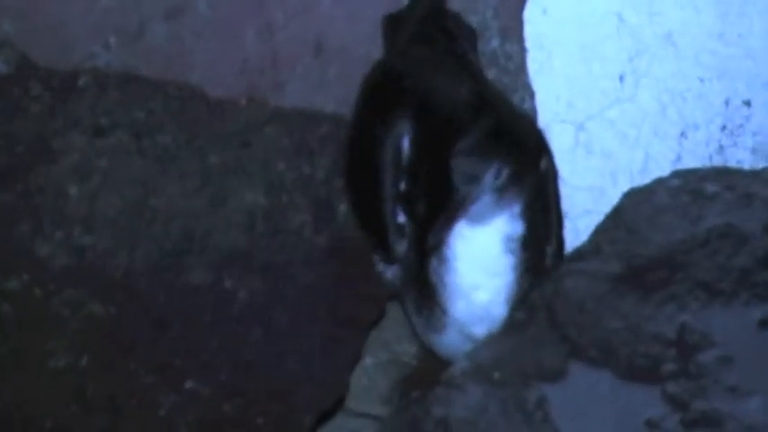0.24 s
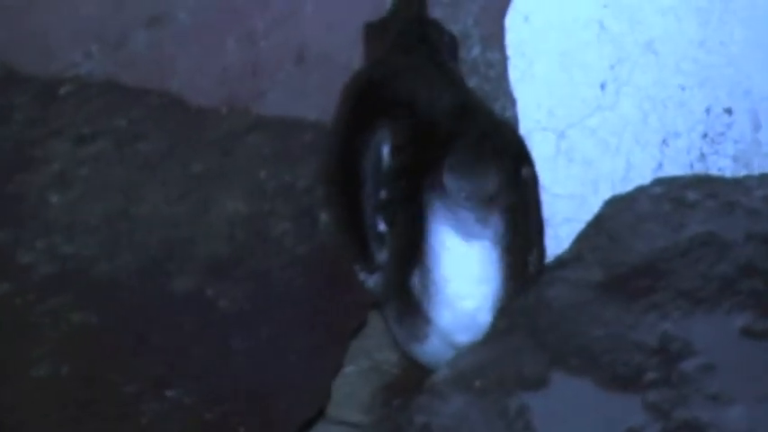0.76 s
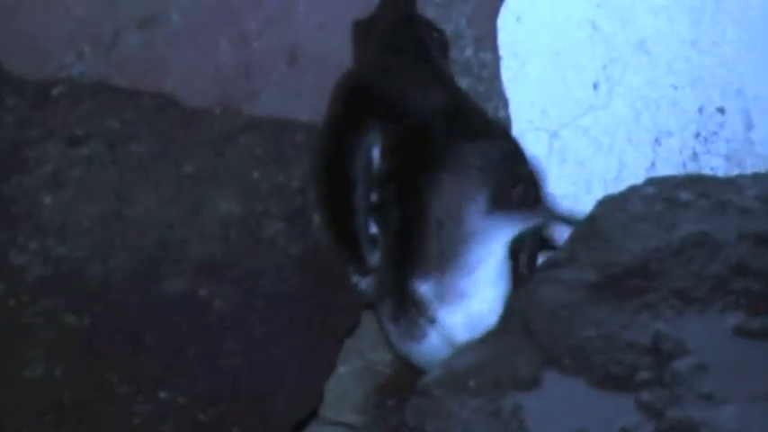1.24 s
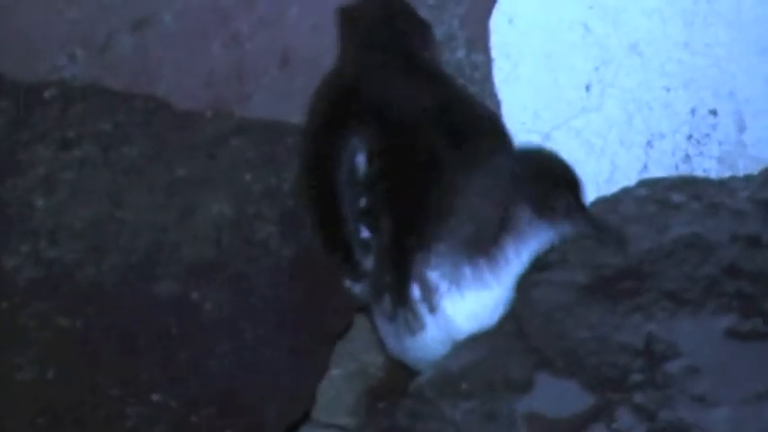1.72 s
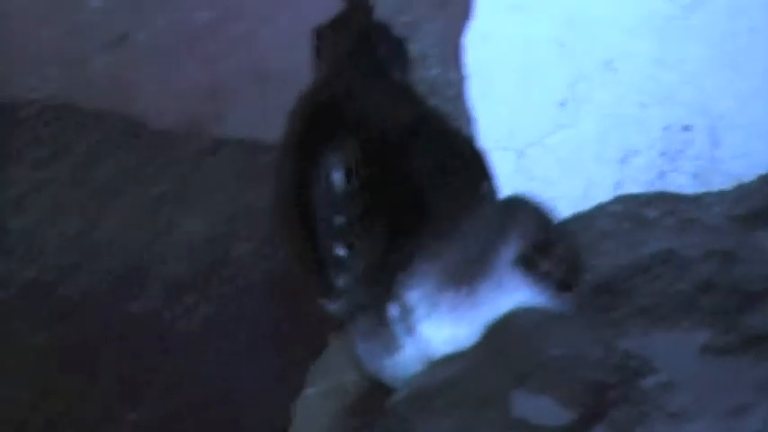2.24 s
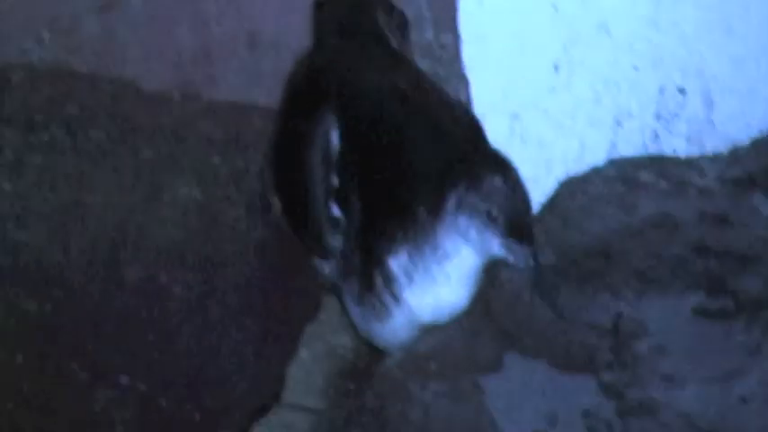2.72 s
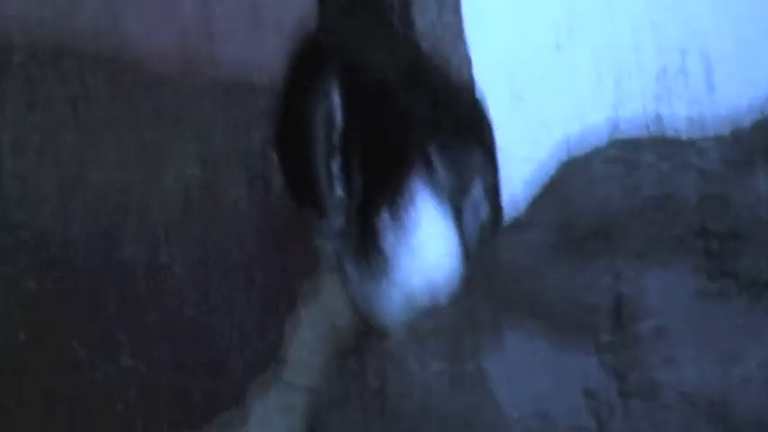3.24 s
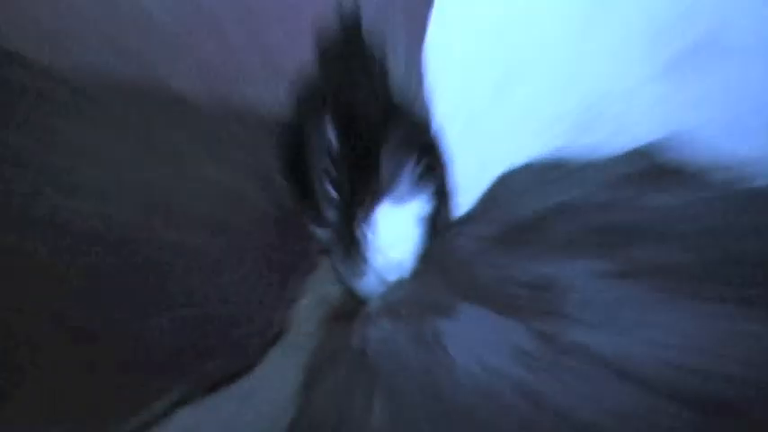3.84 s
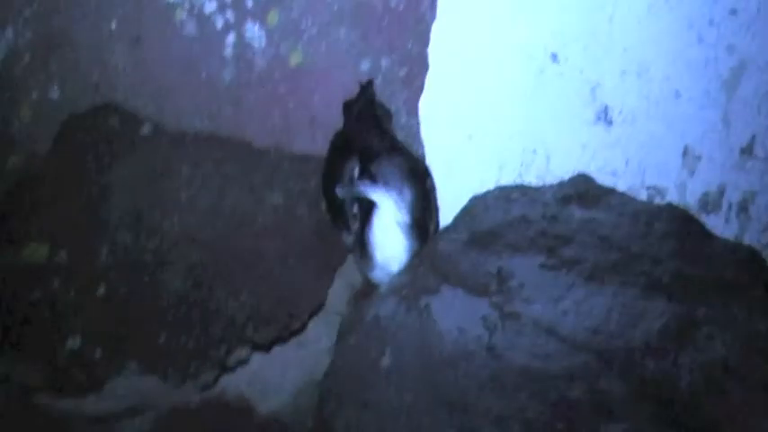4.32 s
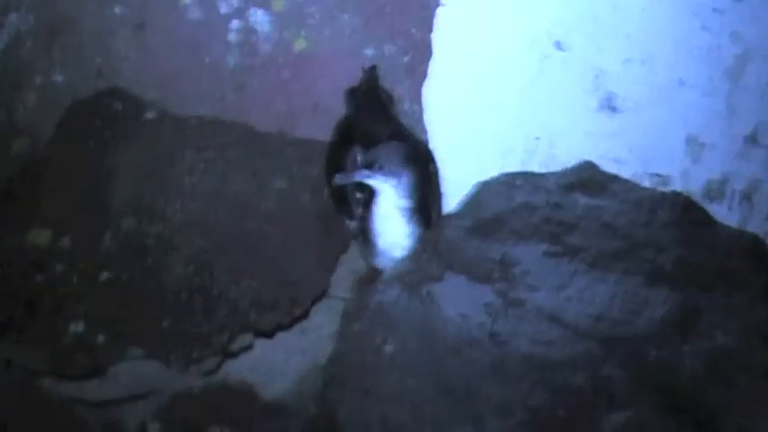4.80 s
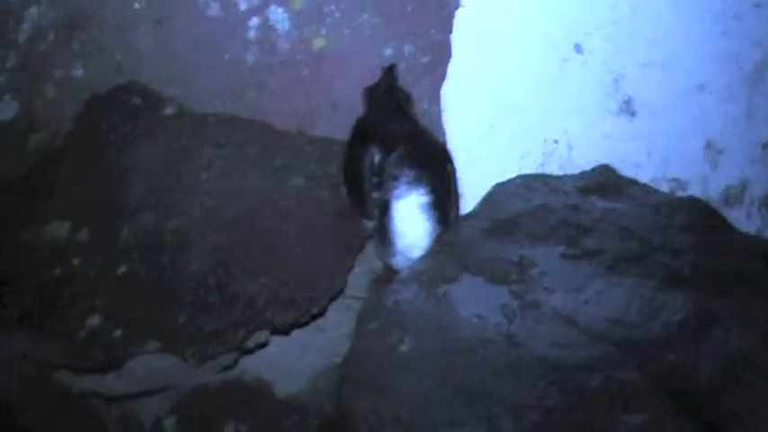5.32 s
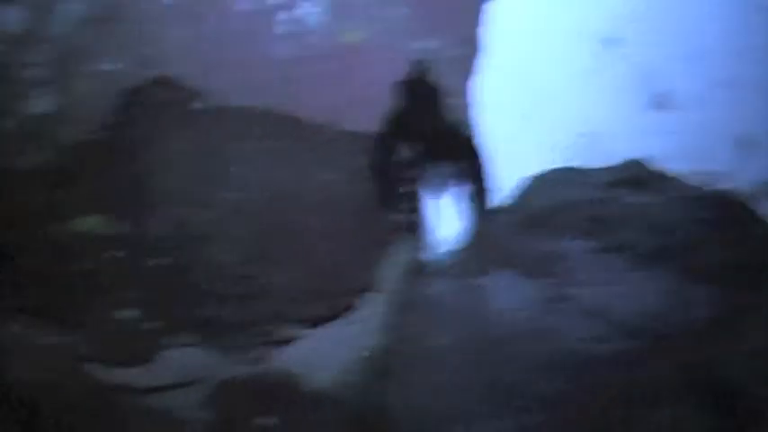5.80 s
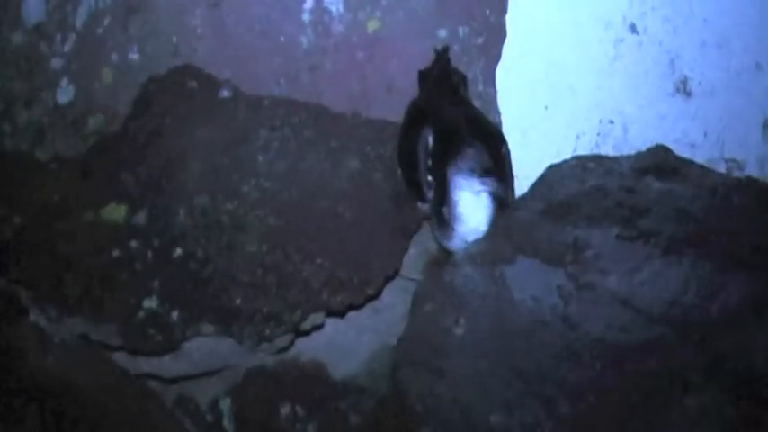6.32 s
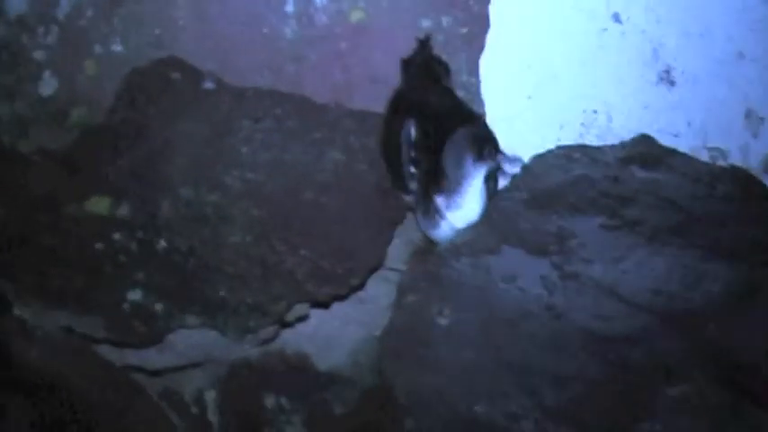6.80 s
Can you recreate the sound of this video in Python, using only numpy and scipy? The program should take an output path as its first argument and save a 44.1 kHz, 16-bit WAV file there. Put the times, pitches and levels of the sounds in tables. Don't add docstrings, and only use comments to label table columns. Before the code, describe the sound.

A continuous, blurred seabird colony in stereo, with short rocky echoes, surf, light wind and microphone hiss. Near hoarse barks and a wheeze open it; brief cries, whistles, squeaks and low moans then stand out in turn. The camera's housing ticks dryly at the microphone, its switch clicks once far louder than everything else, and a sleeve brushes it softly afterwards while the birds carry on.

```python
import sys
import numpy as np
from scipy import signal
from scipy.fft import rfft, irfft, next_fast_len
from scipy.io import wavfile
from scipy.ndimage import uniform_filter1d, map_coordinates

SR = 44100
rng = np.random.default_rng(int(sys.argv[2]) if len(sys.argv) > 2 else 0)


def volts_from_db(level):
    exponent = np.asarray(level, float) / 20
    return 10 ** exponent


def master_out(mix):
    frames = np.transpose(np.atleast_2d(mix))
    ceiling = np.clip(frames, -1, 1)
    pcm = np.round(ceiling * 32767).astype(np.int16)
    wavfile.write(sys.argv[1], SR, pcm)


N = 311331
T = np.arange(N) / SR


def unit(x):
    return x / np.sqrt(np.mean(x ** 2) + 1e-20)


def along(points, hz):
    f, v = np.transpose(points)
    return np.interp(np.log(hz + 1), np.log(f + 1), v)


def wobble(knots_per_s, size=N):
    knots = rng.standard_normal(int(size * knots_per_s / SR) + 4)
    return map_coordinates(knots, [np.arange(size) * knots_per_s / SR])


def humps(rows, slope_db):
    return sum(volts_from_db(db - slope_db * ((T - s) / half_s) ** 2) for s, half_s, db in rows)


def filtered(x, response):
    m = next_fast_len(N + 8192)
    return irfft(rfft(x, m) * response(np.fft.rfftfreq(m, 1 / SR)), m)[..., :N]


def resonances(modes):
    def response(f):
        total = 0
        for k, (c, w, db) in enumerate(modes):
            total = total + (-1) ** k * volts_from_db(db) * 1j * f * w / (c * c - f * f + 1j * f * w)
        return total
    return response


def placed(x, pan_db):
    return x * volts_from_db(np.array([[pan_db / 2], [-pan_db / 2]]))


def spread(pair, gain):
    # hz, side_minus_mid_db
    width_points = [(60, -18), (99, -2), (160, -0.5), (270, -3.5), (450, -5.5), (740, -10), (1220, -0.5),
                    (2010, -4.5), (3330, -5), (5500, -5.5), (9080, -1), (15000, -5)]

    def response(hz):
        turn = np.arctan(volts_from_db(along(width_points, hz)))
        return gain(hz) * (hz < 15830) * [np.cos(turn), np.sin(turn)]
    mid, side = filtered(pair, response)
    return unit(np.array([mid + side, mid - side]))


def echoes(x):
    # hz, t60_s
    decay_points = [(200, 0.35), (2000, 0.19), (10000, 0.2)]
    hz, t, z = signal.stft(rng.standard_normal((2, SR // 2)), SR, nperseg=256)
    fade = volts_from_db(-60 * t / along(decay_points, hz)[:, None])
    tail = signal.istft(z * fade, SR, nperseg=256)[1]
    return signal.fftconvolve(np.atleast_2d(x), tail / np.linalg.norm(tail[0]), axes=1)[:, :N]


def span(start_s, length_s, fade_s):
    cut = slice(round(start_s * SR), min(N, round((start_s + length_s) * SR)))
    u = (T[cut] - start_s) / length_s
    to_edge_s = np.minimum(u, 1 - u) * length_s
    return cut, u, np.sin(np.clip(to_edge_s / fade_s, 0, 1) * np.pi / 2)


def burst(hz, width_hz, t60):
    t = T[:SR // 25]
    edges_hz = [max(hz - width_hz / 2, 50), min(hz + width_hz / 2, .45 * SR)]
    band = signal.butter(2, edges_hz, "band", fs=SR, output="sos")
    snap = signal.sosfilt(band, rng.standard_normal(len(t)) * volts_from_db(-60 * t / t60))
    return snap / abs(snap).max()


def air():
    # hz, db_per_hz
    bed_points = [(15, -40.5), (25, -15), (170, -14), (255, -15), (462, -7.5), (605, -10), (984, -2.5),
                  (1360, -4), (1830, -23.5), (3140, -26), (4470, -29), (5250, -29), (15900, -41)]
    # peak_s, half_length_s, level_db
    gust_rows = [
        (0, 0.18, -66),
        (2.45, 0.4, -67),
        (3.65, 0.37, -62),
        (4.8, 0.46, -66),
        (6.25, 0.21, -56),
        (6.65, 0.2, -61),
    ]
    whine = resonances([(8750, 200, 0)])
    bed = spread(rng.standard_normal((2, N)), lambda hz: volts_from_db(along(bed_points, hz)) * (1 + 0.75 * abs(whine(hz))))
    treble = filtered(bed, lambda hz: (hz > 6000) & (hz < 15000))
    rumble = resonances([(130, 220, 0)])
    wind = unit(filtered(rng.standard_normal((2, N)), lambda hz: abs(rumble(hz)) ** 2))
    gusts = volts_from_db(-71) + humps(gust_rows, slope_db=6.0)
    lumps = volts_from_db(-5.0 + 0.74 * np.array([wobble(12), wobble(12)]))
    return volts_from_db(-75 + 3.5 + 0.22 * wobble(2.65)) * bed / treble.std() + gusts * lumps * wind


def throats(count, low_hz, octaves, notes_per_s, jitter):
    out, step = np.zeros((2, N)), 50
    coarse_s = T[::step]
    size = len(coarse_s)
    for k in range(count):
        pitch_hz = low_hz * 2 ** (octaves * rng.uniform() + .13 * wobble(9 * step, size=size))
        cycles = np.cumsum(pitch_hz) * step / SR
        beat = np.arange(1, cycles[-1])
        pulse_s = np.interp(beat + jitter * rng.standard_normal(len(beat)), cycles, coarse_s)
        effort = np.clip(wobble(notes_per_s * step, size=size) - .3, 0, 1.4) / np.sqrt(pitch_hz)
        level_db = rng.normal(0, 1.6) + rng.normal(0, 2.5, len(pulse_s))
        strength = np.interp(pulse_s, coarse_s, effort) * volts_from_db(level_db)
        out[k % 2] += np.bincount((pulse_s * SR).astype(int), strength, N)
    return unit(out - out.mean())


def crowd():
    # time_s, level_db
    loudness_points = [(0.0, -48), (0.79, -48), (1.12, -49.5), (1.36, -51.5), (2.02, -48), (2.54, -52.5),
                       (3.07, -49.5), (3.55, -50.5), (3.85, -49), (4.62, -49.5), (5.31, -51), (5.48, -52.5),
                       (5.7, -50.5), (6.49, -49.5), (6.8, -52), (7.06, -48.5)]
    # hz, db_per_hz
    roar_points = [(120, -17.5), (200, -9), (231, -18.5), (472, -8.5), (594, -10), (738, -7), (1130, 0),
                   (2140, -17), (2830, -21), (3080, -31.5), (3600, -24), (4680, -30), (7920, -120)]
    # peak_s, half_length_s, level_db
    surge_rows = [
        (.92, 0.15, -70),
        (2.9, 0.15, -71),
        (3.75, 0.23, -71),
        (6.25, 0.073, -57),
        (6.6, 0.84, -66.5),
    ]
    roar_db = np.interp(T, *np.transpose(loudness_points))
    voices = throats(count=44, low_hz=331, octaves=1.9, notes_per_s=11, jitter=0.072)
    blur = voices + volts_from_db(1.5) * echoes(voices) + volts_from_db(2.0) * rng.standard_normal((2, N))
    roar = spread(blur, lambda hz: volts_from_db(along(roar_points, hz)))
    roar = roar / np.sqrt(uniform_filter1d(np.mean(roar ** 2, axis=0), size=6000) + 1e-9)

    chicks = throats(count=12, low_hz=914, octaves=1.1, notes_per_s=25, jitter=0.05)
    chicks = chicks + volts_from_db(1) * rng.standard_normal((2, N))
    squeal = spread(chicks, lambda hz: resonances([(4350, 900, 0)])(hz) ** 2)
    surge = volts_from_db(-68 + 1.5 * (roar_db - roar_db.mean()) + 3 * wobble(2.96))
    surge = surge + humps(surge_rows, slope_db=11.0)

    pipers = throats(count=16, low_hz=1700, octaves=.75, notes_per_s=30, jitter=.06)
    chatter = spread(pipers + volts_from_db(4) * echoes(pipers), lambda hz: resonances([(2300, 1600, 0)])(hz) ** 2)
    return volts_from_db(-69) * chatter + volts_from_db(roar_db + 1.0) * roar + volts_from_db(-5.0) * surge * squeal


def sleeve():
    # start_s, length_s, level_db, swell_db, weave_index
    strokes = [
        (4.914, 0.21, -68.5, 8, 0),
        (5.084, .11, -59.5, 9, 0),
        (6.031, 0.265, -60, -2, 1),
        (6.4, .17, -70.5, 6, 1),
    ]
    # hz, width_hz, level_db
    weaves = [
        [(3354, 1400, 10), (10000, 930, 9), (14500, 2300, -1)],
        [(2330, 1200, 5.5), (4300, 700, 3.5), (5560, 630, 2.5), (8450, 1400, 3), (12300, 1700, 0.5)],
    ]
    grains = rng.standard_normal((2, N)) * volts_from_db(0.88 * wobble(300) + 1.6 * wobble(40))
    rubs = [spread(grains, lambda hz: abs(resonances(weave)(hz)) + 0.14 * (hz > 1500)) for weave in weaves]
    out = np.zeros((2, N))
    for start_s, length_s, db, swell_db, weave in strokes:
        cut, u, edge = span(start_s, length_s, 0.041)
        gain = volts_from_db(db + 5.5 + swell_db * (u - .5)) * edge
        out[:, cut] += placed(gain * rubs[round(weave)][:, cut], .3 + 6.1 * round(weave))
    return out


def ticks():
    # start_s, peak_db, body_db, left_minus_right_db
    tick_rows = [(0.4324, -51, -59, -3), (1.655, -58, -60, 0), (1.9138, -32, -44, 9), (1.9148, -37, -42, 4),
                 (1.9545, -55, -44, 0.0), (2.4804, -48, -62, 7), (2.915, -54, -45, 0.0),
                 (3.254, -66, -56, 2), (3.3552, -48, -39, -0.5), (3.3684, -53, -52, 0.5),
                 (3.411, -40, -40, -7), (3.7938, -51, -54, 2), (4.7063, -64, -43, 5),
                 (4.744, -57, -52, 0.5), (4.8145, -47, -38, -8), (4.8514, -60, -50, -0.5),
                 (4.8747, -42, -38, -4), (4.9073, -46, -54, 7), (4.9445, -48, -51, 16),
                 (4.9505, -39, -42, -7), (4.96, -62, -47, 0), (4.9714, -62, -42, -2),
                 (5.1098, -48, -56, -2), (5.1376, -50, -38, 7), (5.3066, -56, -39.5, 5),
                 (5.3522, -50, -51, 9), (5.4141, -46, -43, -3), (5.5691, -41.5, -44, -10),
                 (6.3101, -59, -39.5, 10), (6.329, -57, -39, 12), (6.3485, -57, -41, 8),
                 (6.6862, -41, -50, 6), (6.69, -46, -53, 12.5)]
    # start_s, peak_db
    knock_rows = [
        (1.9155, -37),
        (3.2565, -34),
        (4.8165, -34),
        (5.138, -33.5),
        (6.328, -37),
    ]
    out = np.zeros((2, N + SR))
    for s, db, body_db, pan_db in tick_rows:
        tick = volts_from_db(db) * burst(9400, 11900, t60=0.0075) + volts_from_db(body_db) * burst(2600, 3200, t60=0.013)
        out[:, round(s * SR):][:, :len(tick)] += placed(tick, pan_db)
    for s, db in knock_rows:
        knock = volts_from_db(db) * burst(1164, 1170, t60=0.037)
        out[:, round(s * SR):][:, :len(knock)] += knock
    return out[:, :N]


def panels():
    # start_s, pitch_hz, peak_db, t60_s
    panel_rows = [(1.9137, 1150, -29, .03), (1.9142, 3250, -32, .02), (1.9140, 5500, -36, .01),
                  (1.9140, 10400, -39, .008), (1.9140, 9000, -40, .008), (3.2541, 1150, -28, .022),
                  (3.2545, 2500, -39, .025), (3.2548, 610, -36, .035), (3.2545, 1850, -34, .025),
                  (3.2546, 3100, -40, .025), (4.8153, 1000, -30, .03), (4.8148, 1950, -33, .02),
                  (4.8150, 2550, -33, .02), (4.8146, 4000, -37, .012), (4.8156, 3200, -34, .015),
                  (4.8150, 6300, -43, .012), (5.1378, 2300, -38, .015), (5.1378, 3800, -39, .012),
                  (5.1378, 4900, -40, .012)]
    out, t = np.zeros(N + SR), T[:SR // 25]
    for s, hz, db, t60 in panel_rows:
        decay = volts_from_db(db + 2.5 * wobble(400, size=len(t)) - 60 * t / t60)
        attack = 1 - np.exp(-t / .0002)
        out[round(s * SR):][:len(t)] += decay * attack * np.sin(2 * np.pi * hz * t)
    return out[:N]


def switch():
    # start_s, peak_db, pitch_hz, brightness_db
    contacts = [
        (4.2734, -19, 3900, -33),
        (4.2737, -16.5, 2540, -27),
        (4.2781, -9, 3200, -7),
        (4.2786, -6, 3700, -6),
        (4.2807, -7.5, 2540, -12),
        (4.281, -11, 4500, -12),
        (4.284, -19, 2650, -22),
        (4.2862, -19, 2900, -20),
        (4.2849, -18, 3600, -20),
        (4.288, -28, 2940, -22),
    ]
    # hz, level_db, t60_s
    shell_modes = [(1240, -17, 0.05), (2650, -2, 0.023), (3370, -12.5, 0.041), (3600, -19, 0.086),
                   (3900, -14, .06), (4200, -12, 0.055), (4800, -13, 0.065), (7200, -24, .054),
                   (5450, -14, 0.04), (8900, -40, 0.06), (10100, -28, 0.065), (10790, -40, 0.059)]
    out, t = np.zeros(N), T[:SR // 25]
    for s, db, pitch_hz, bright_db in contacts:
        ring = 0
        for hz, level_db, t60 in shell_modes:
            mode_db = level_db + rng.normal(0, 2.7) + 4.5 * wobble(430, size=len(t)) - 60 * t / t60
            ring = ring + volts_from_db(mode_db) * np.sin(2 * np.pi * hz * t)
        envelope = 1.6 * (1 - np.exp(-t / 0.00013)) * volts_from_db(-60 * t / 0.0035)
        snap = envelope * np.sin(2 * np.pi * pitch_hz * t)
        snap = snap + volts_from_db(bright_db) * burst(9000, 7000, t60=0.0031)
        rattle = volts_from_db(-15.5) * burst(2950, 3800, t60=0.045)
        out[round(s * SR):][:len(t)] += volts_from_db(db + 1.0) * (snap + rattle + volts_from_db(-19.5) * ring)
    out = filtered(out, lambda hz: 1j * hz / (110 + 1j * hz))

    jolt = np.zeros(N)
    shake = volts_from_db(-21) * burst(554, 127, t60=0.061) + volts_from_db(-36) * burst(200, 200, t60=0.05)
    jolt[round(contacts[1][0] * SR):][:len(t)] = shake
    thud = np.zeros(N)
    thud[round(contacts[2][0] * SR):][:len(t)] = volts_from_db(-45 - 60 * t / .08) * np.sin(2 * np.pi * 90 * t)
    delayed = np.roll(out, 5)
    return thud + jolt * [[1], [-.75]] + placed(out, -8.5) + volts_from_db(-30) * np.array([delayed, -delayed])


def notes(rows, partials, top, bend, rasp_db, waver, droop, scoop=0., scoop_per_s=0., fade_s=0.015):
    out = np.zeros((2, N))
    for start_s, length_s, mid_hz, db, *slant_hz in rows:
        cut, u, edge = span(start_s, length_s, fade_s)
        rise = np.clip(1 - u / top, 0, 1)
        fall = np.clip((u - top) / (1 - top), 0, 1)
        depth = scoop + scoop_per_s * length_s
        arch = 1 - depth * rise ** (1.65 * bend) - droop * fall ** bend
        hz = mid_hz * arch + sum(slant_hz) * (u - .5)
        turn = 2 * np.pi * np.cumsum(hz * (1 + waver * wobble(119.0, size=len(u)))) / SR
        tone = sum(volts_from_db(level_db) * np.sin(ratio * turn) for ratio, level_db in partials)
        gain = np.sqrt(2) * volts_from_db(db + rasp_db * wobble(90.5, size=len(u))) * edge
        out[:, cut] += placed(gain * tone, rng.normal(0, 0.91))
    return out


def callers():
    # start_s, length_s, top_hz, level_db, slant_hz
    whistle_rows = [(0.029, 0.067, 3075, -64.5, -151), (0.189, 0.035, 3575, -64.5, -1),
                    (0.271, 0.044, 2805, -67.5, -1), (0.421, 0.061, 3125, -64.5, -101),
                    (0.796, 0.077, 3055, -62.4, 40), (1.168, 0.084, 2945, -68.5, 60),
                    (1.618, 0.072, 2965, -65.5, -1), (1.801, 0.041, 2835, -65.5, -1),
                    (2.336, 0.031, 2705, -64.5, 501), (2.376, 0.044, 2875, -64.5, -201),
                    (2.426, 0.049, 2825, -69.5, 101), (2.552, 0.041, 2905, -67.5, -251),
                    (2.693, 0.079, 3005, -60.5, -1), (2.701, 0.021, 2755, -65.5, 201),
                    (2.841, 0.031, 2685, -66.5, 251), (3.046, 0.098, 2945, -59.9, -60),
                    (3.481, 0.098, 2945, -62.4, -1), (3.956, 0.075, 2935, -65.2, -1),
                    (4.146, 0.034, 2815, -59.5, -1), (4.206, 0.124, 3035, -58.6, -1),
                    (4.396, 0.087, 2865, -62.8, -1), (4.701, 0.034, 2815, -58.5, -1),
                    (4.76, 0.142, 2990, -60.5, -260), (5.286, 0.092, 2865, -56.8, -40),
                    (5.336, 0.086, 3115, -67.2, -40), (5.646, 0.026, 2885, -67.5, 251),
                    (5.691, 0.034, 2885, -67.5, 251), (5.772, 0.094, 3165, -65, -101),
                    (5.869, 0.091, 3125, -61.4, -1), (6.211, 0.08, 2960, -65.2, -1),
                    (6.644, 0.076, 2945, -60.8, -1), (6.831, 0.044, 2355, -63.5, 101),
                    (6.846, 0.049, 2885, -69.5, 201)]
    # start_s, length_s, top_hz, level_db
    squeak_rows = [(1.51, .06, 4500, -65), (2.53, 0.069, 4550, -69), (2.57, 0.035, 4500, -75.5),
                   (2.68, 0.048, 4470, -65), (2.735, .04, 4020, -69), (2.83, .04, 4500, -70),
                   (2.88, .035, 4570, -63), (2.9, .04, 4400, -65), (2.94, 0.065, 4500, -62),
                   (2.99, .05, 4600, -65), (3.06, 0.055, 4400, -67), (2.9, .04, 4900, -70),
                   (6.98, 0.028, 4480, -64), (6.53, .05, 4230, -61.5), (3.59, 0.059, 4510, -61.5),
                   (3.74, 0.054, 4420, -64), (5.33, 0.068, 4140, -69), (6.0, 0.062, 4260, -64),
                   (6.83, 0.035, 4430, -61.5), (6.855, .03, 4600, -65)]
    # start_s, length_s, middle_hz, level_db, slant_hz
    peep_rows = [(1.075, 0.045, 2120, -62, 250), (1.27, .035, 1950, -66, -150),
                 (1.632, 0.048, 2070, -56.5, -180), (3.595, 0.04, 1620, -58, 200),
                 (4.66, .035, 1650, -56, 40), (4.83, .04, 1930, -63, 40), (5.27, 0.056, 1880, -59, -420),
                 (5.33, 0.098, 1770, -66, 30), (5.43, .1, 1810, -67, 120), (5.538, 0.034, 2060, -58, 443),
                 (5.76, 0.057, 2060, -63, -20), (5.7, 0.035, 1780, -60.5, -150), (6.2, .06, 2400, -67, 300),
                 (5.8, .04, 2380, -66, 0), (2.315, .045, 2600, -71, -150), (2.72, .04, 2150, -65, 40),
                 (4.13, .11, 4300, -69.5, 58), (5.23, .05, 2350, -66, 100), (5.73, .04, 2350, -65, -300),
                 (6.58, .07, 1740, -63, -60), (6.34, .2, 2230, -69, 0), (3.89, .05, 1880, -65, 0)]
    # start_s, length_s, middle_hz, level_db, slant_hz
    wail_rows = [
        (.28, 0.12, 763, -52, 92),
        (.55, 0.2, 795, -50.5, -110),
        (.74, 0.173, 734, -53, -41),
    ]
    # start_s, length_s, middle_hz, level_db, slant_hz
    thread_rows = [
        (6.7, .19, 5000, -73, -290),
        (6.73, .05, 4080, -68, -30),
    ]
    # start_s, length_s, middle_hz, level_db, slant_hz
    cry_rows = [(1, 0.046, 1155, -51.5, -33), (3.7, 0.056, 1100, -52, 177), (3.78, .17, 1037, -55.5, 47),
                (4.07, 0.049, 1040, -52, 13), (6.02, 0.053, 1085, -48.5, -68),
                (6.18, 0.045, 1060, -50, -160), (6.22, .11, 940, -52.5, -20), (6.33, .09, 930, -55, -20),
                (6.73, 0.055, 1107, -51, -200), (4.21, .05, 1290, -53, 0), (.88, .07, 1240, -54, 120),
                (.7, .07, 1470, -55, -40), (6.24, .11, 1380, -57, -20), (5.61, .06, 1350, -59, 120),
                (5.82, .06, 1080, -53, -100), (5.28, .1, 860, -54, -40), (3.86, .08, 1120, -54, 0),
                (.2, .1, 1260, -56, 80), (6.86, 0.072, 952, -50.5, 14), (6.91, 0.12, 1111, -50.5, 31),
                (.57, 0.09, 1450, -50, -40), (.8, .09, 1426, -55, 80), (1.94, 0.086, 1405, -52.5, 40),
                (2.07, 0.078, 1450, -55.5, -70), (0, 0.043, 1403, -50, -200),
                (3.715, 0.07, 1340, -53, -220), (3.14, .06, 1040, -53, 120), (3.34, .1, 990, -54, 30),
                (2.91, .05, 1080, -54, 80), (3.63, .04, 1280, -54, -60), (5.94, .04, 1100, -53, 0),
                (6.6, 0.057, 1430, -54, 0), (6.69, 0.033, 1262, -53, -28)]
    # start_s, length_s, middle_hz, level_db, slant_hz
    moan_rows = [
        (3.44, 0.036, 466, -47, 28),
        (6.69, 0.079, 430, -46, -25),
        (6.915, 0.07, 700, -52, 153),
        (6.87, 0.058, 440, -52, 116),
        (5.77, .06, 520, -52, 120),
        (5.5, .07, 360, -52, 30),
        (5.47, .04, 750, -52, 0),
    ]
    whistles = notes(whistle_rows, [(1, 0), (2, -32)], top=.34, bend=2.9, rasp_db=2.2, waver=.003,
                     droop=0.141, scoop=.04, scoop_per_s=2.33, fade_s=.008)
    squeaks = notes(squeak_rows, [(1, -5), (.955, -14), (1.04, -15)], top=.5, bend=1.5, rasp_db=3.5,
                    waver=.013, droop=.03, scoop=.025)
    peeps = notes(peep_rows, [(1, 3.5), (2, -31)], top=0.4, bend=1.27, rasp_db=2, waver=0.0096,
                  droop=0.031, scoop=0.029)
    wails = notes(wail_rows, [(.5, -21.5), (1, -1.5), (1.5, -12), (2, -6), (2.5, -14)], top=0.61, bend=0.99,
                  rasp_db=2.5, waver=.009, droop=-0.0088, scoop=-0.0201)
    threads = notes(thread_rows, [(1, 0)], top=.5, bend=1.5, rasp_db=1.5, waver=.002, droop=.001)
    cries = notes(cry_rows, [(1, 0), (2 / 3, -12), (4 / 3, -12)], top=0.56, bend=0.85, rasp_db=2.5,
                  waver=0.015, droop=0.029, scoop=.02)
    moans = notes(moan_rows, [(1, -5.0), (2, -8.5), (3, -34)], top=0.52, bend=2.1, rasp_db=2.0,
                  waver=0.006, droop=0.18, scoop=0.13)
    return threads + whistles + squeaks + peeps + wails + cries + moans


def hoarse(rows, pulse_hz, breath, modes):
    effort = 0
    for s, held_s, db in rows:
        rise_db = 600 * np.clip(s - T, 0, 1)
        fall_db = 480 * np.clip(T - s - held_s, 0, 1)
        effort = effort + volts_from_db(db - rise_db - fall_db)
    cycles = np.cumsum(pulse_hz * volts_from_db(.9 * wobble(50)) / SR)
    beats = np.diff(np.floor(cycles), prepend=0)
    drive = unit(beats * volts_from_db(rng.normal(0, 5.2, N))) + breath * rng.standard_normal(N)
    mouth = resonances([(1900, 1200, 0)])
    return effort * unit(filtered(drive, lambda hz: resonances(modes)(hz) * (mouth(hz) + 0.034)))


def barks():
    # start_s, held_s, level_db
    bark_rows = [
        (.155, 0.016, -40.5),
        (.2, 0.032, -53.5),
        (.34, 0.046, -50),
        (.41, 0.02, -53),
        (.46, .01, -54),
        (.5, 0.016, -56),
        (.535, 0.021, -51),
    ]
    # start_s, length_s, middle_hz, level_db, slant_hz
    yelp_rows = [
        (.148, .045, 1810, -37.5, -200),
        (.19, .055, 1760, -58, -30),
        (.325, 0.075, 1750, -45.5, -30),
        (.4, .045, 1860, -52, 0),
        (.53, 0.036, 1850, -44, -220),
        (.335, .04, 1870, -48.5, -40),
        (.41, .04, 1700, -52, 0),
        (.52, .04, 2210, -55, -40),
        (.48, .04, 2400, -58, -200),
        (.57, .06, 1850, -55, -80),
    ]
    # start_s, held_s, level_db
    wheeze_rows = [
        (.58, 0.26, -49),
    ]
    # hz, width_hz, level_db
    throat_modes = [(1700, 290, 19.5), (2570, 660, 10), (1390, 300, -8), (2900, 500, -27), (4900, 2000, 1)]
    # hz, width_hz, level_db
    gape_modes = [(1100, 250, -8), (1450, 220, -5.5), (1720, 200, -12), (2000, 300, -34)]
    bark = hoarse(bark_rows, pulse_hz=190, breath=1.8, modes=throat_modes)
    yelps = notes(yelp_rows, [(1, 0), (4 / 3, -20), (.5, -14)], top=.3, bend=1.5, rasp_db=4.2, waver=.02,
                  droop=.01, scoop=.03, fade_s=.012).mean(axis=0)
    wheeze = hoarse(wheeze_rows, pulse_hz=365, breath=0.35, modes=gape_modes)
    return placed(bark + yelps + volts_from_db(-3.5) * wheeze, 4.7)


def scene():
    night = air() + crowd() + sleeve()
    hand = ticks() + panels() + switch()
    birds = callers() + barks()
    return night + hand + birds + volts_from_db(-6.5) * echoes(birds)


def band_limit(x):
    return signal.sosfilt(signal.butter(12, 16650, fs=SR, output="sos"), x)


def record(dry):
    soft = dry / (1 + abs(dry / .75) ** 4) ** .25
    mix = filtered(soft, lambda hz: (hz < 16200) * hz ** 2 / (hz ** 2 + 36 ** 2))
    return band_limit(mix)


dry = scene()
out = record(dry)
master_out(out)
```